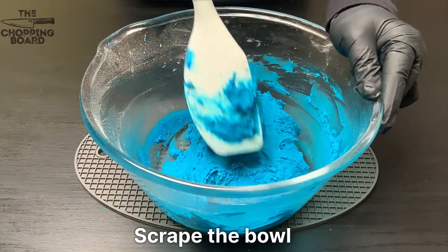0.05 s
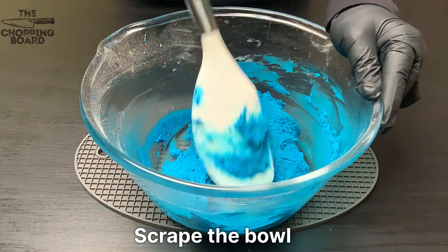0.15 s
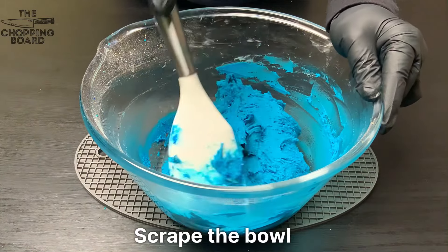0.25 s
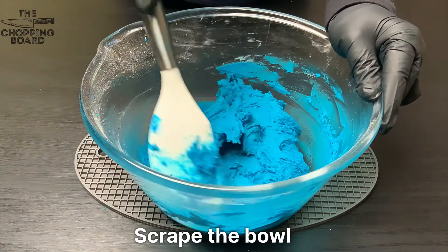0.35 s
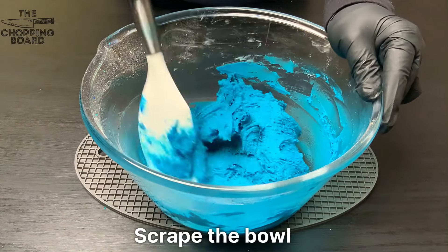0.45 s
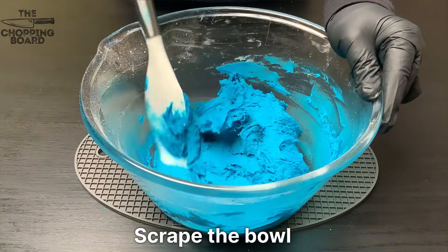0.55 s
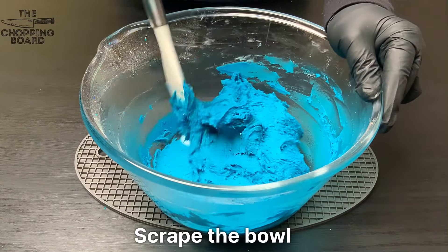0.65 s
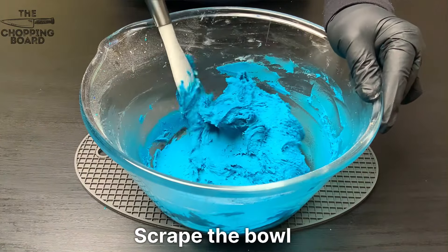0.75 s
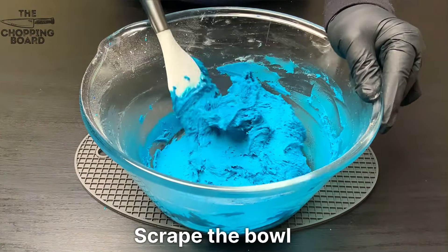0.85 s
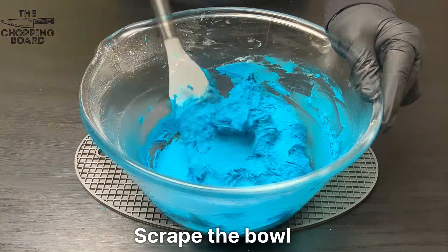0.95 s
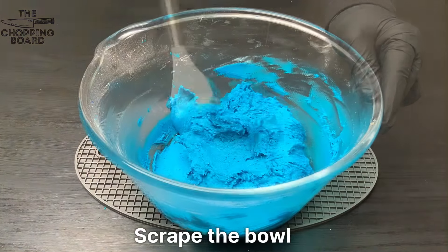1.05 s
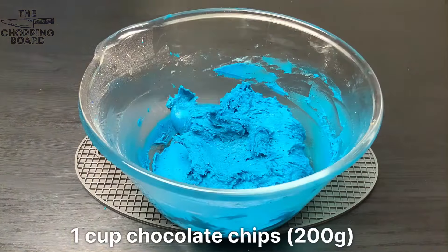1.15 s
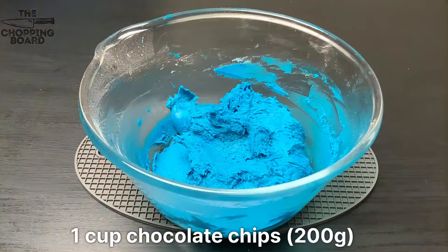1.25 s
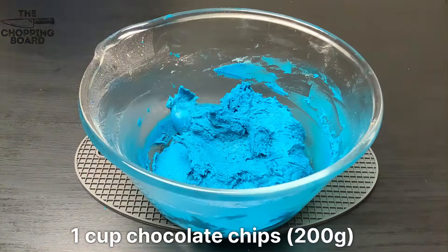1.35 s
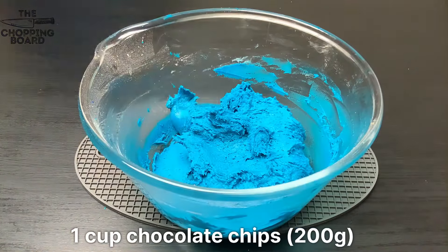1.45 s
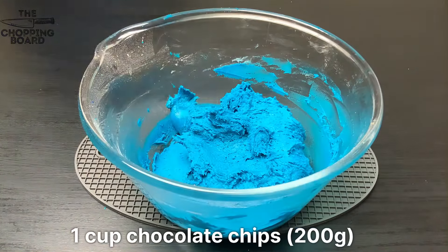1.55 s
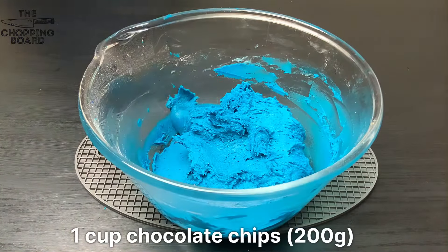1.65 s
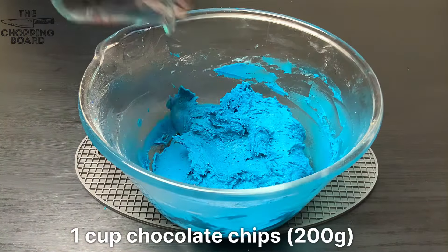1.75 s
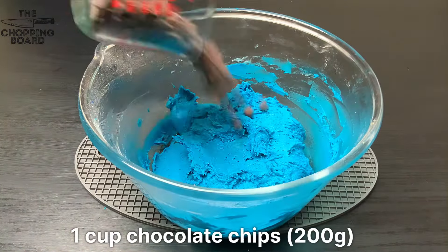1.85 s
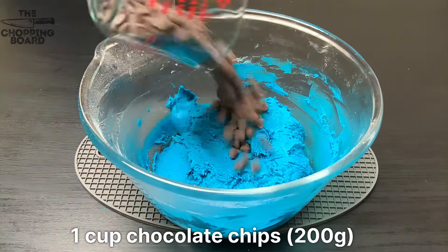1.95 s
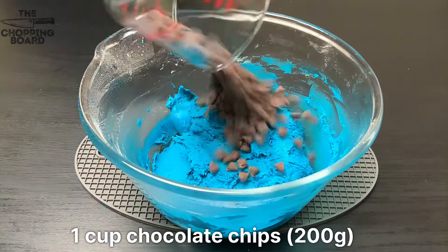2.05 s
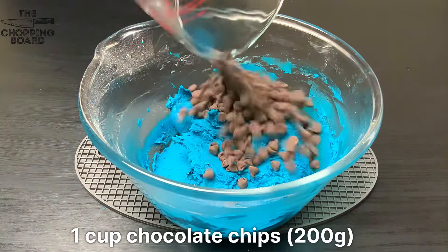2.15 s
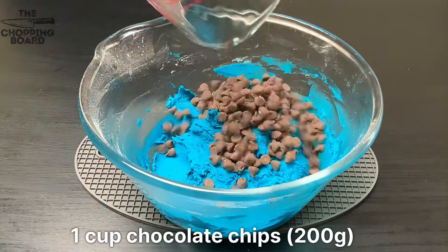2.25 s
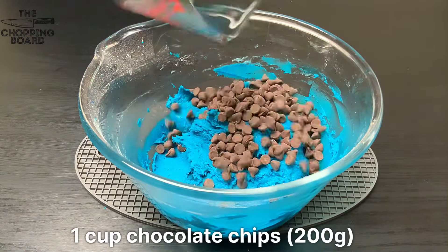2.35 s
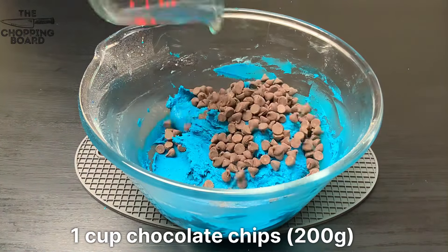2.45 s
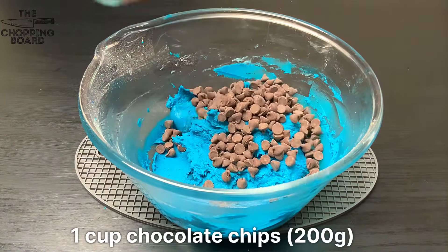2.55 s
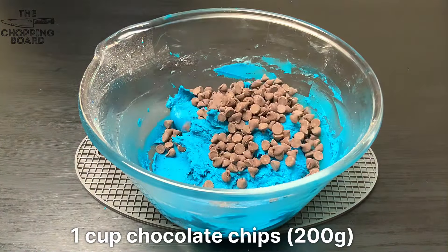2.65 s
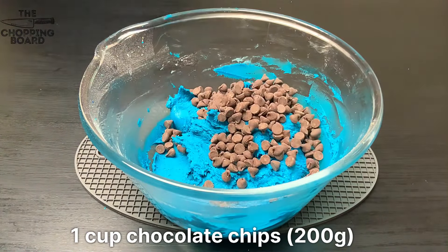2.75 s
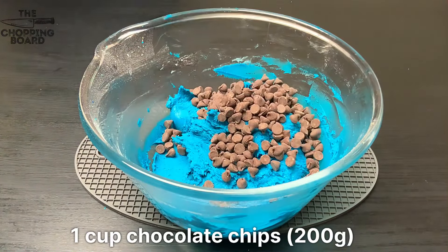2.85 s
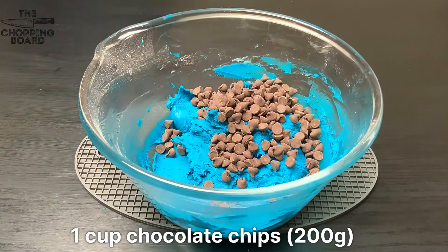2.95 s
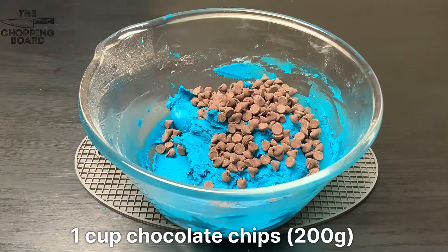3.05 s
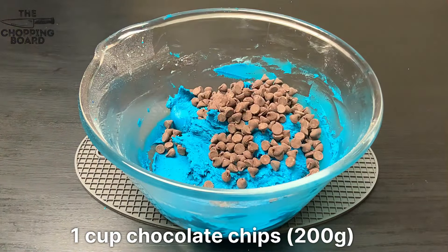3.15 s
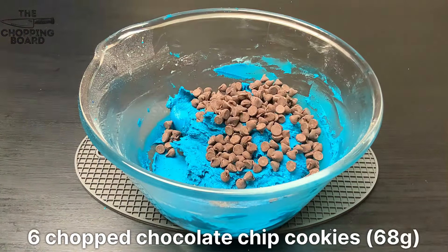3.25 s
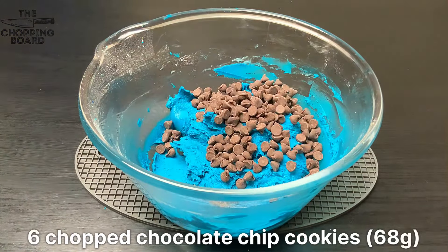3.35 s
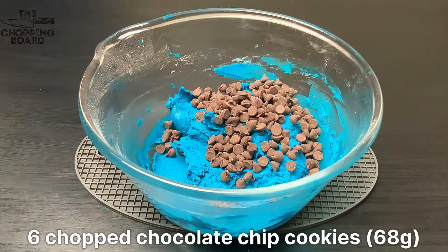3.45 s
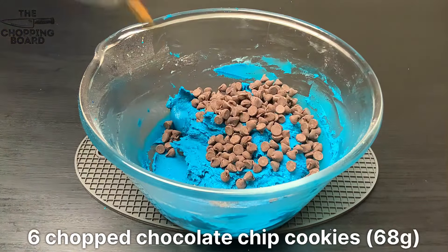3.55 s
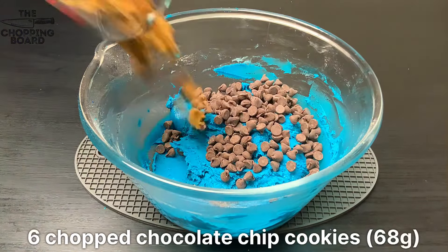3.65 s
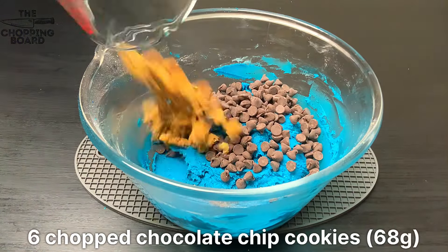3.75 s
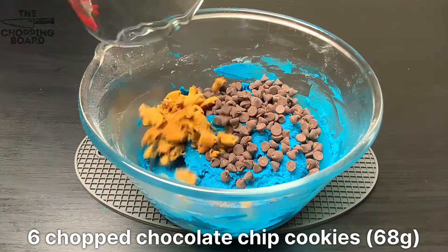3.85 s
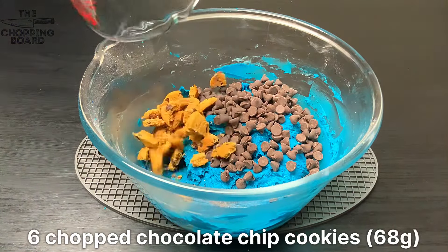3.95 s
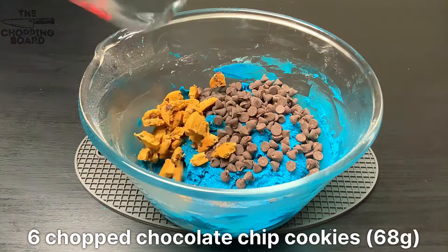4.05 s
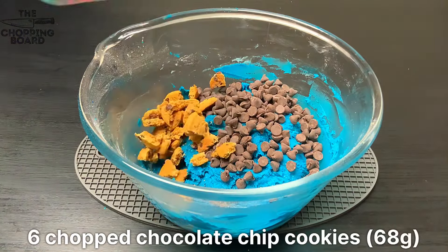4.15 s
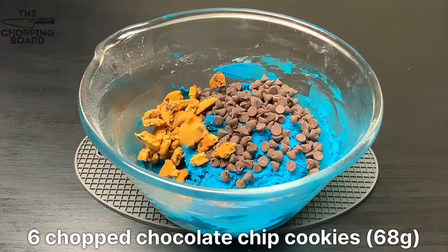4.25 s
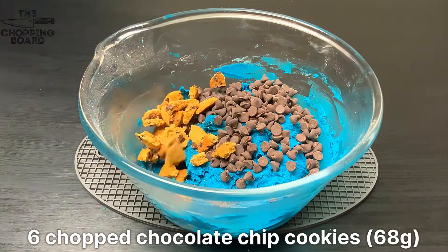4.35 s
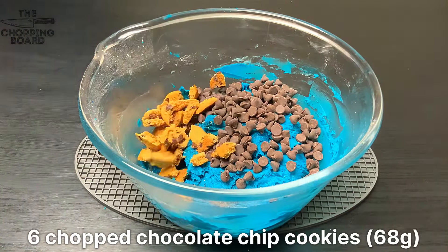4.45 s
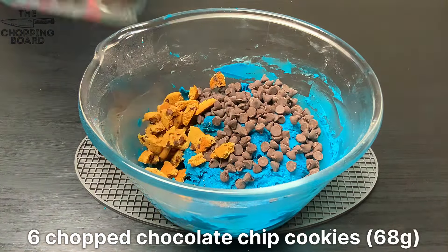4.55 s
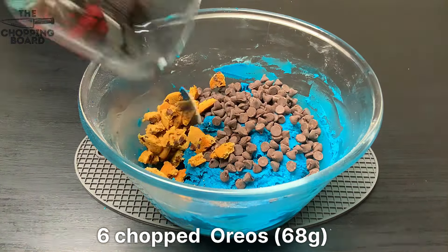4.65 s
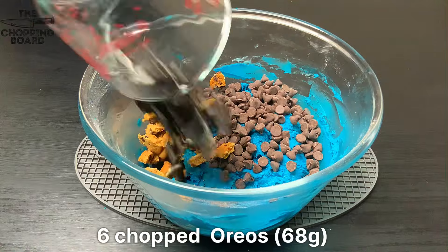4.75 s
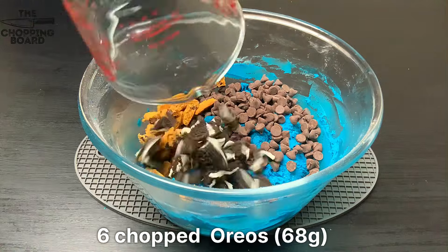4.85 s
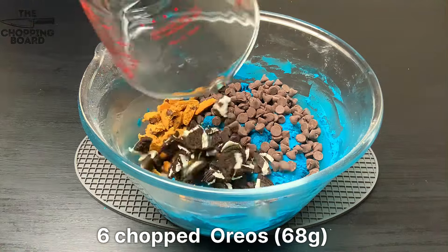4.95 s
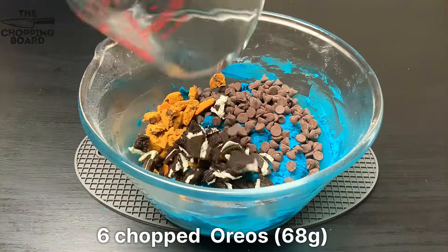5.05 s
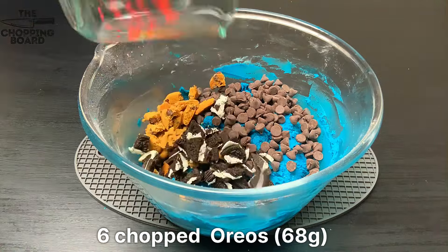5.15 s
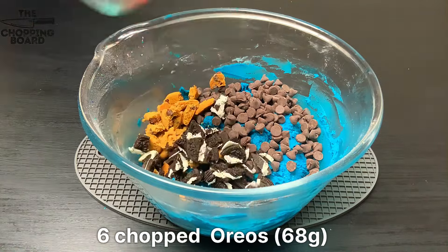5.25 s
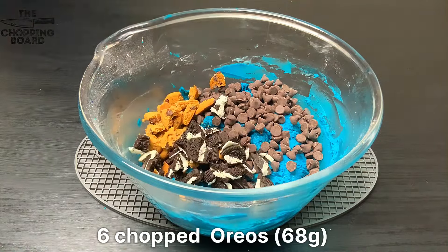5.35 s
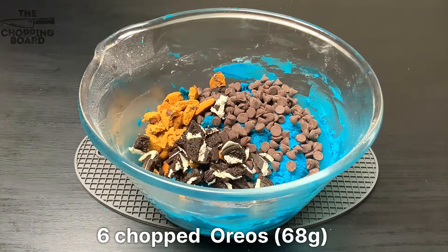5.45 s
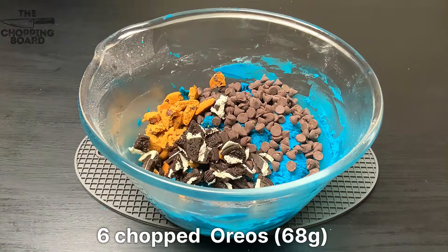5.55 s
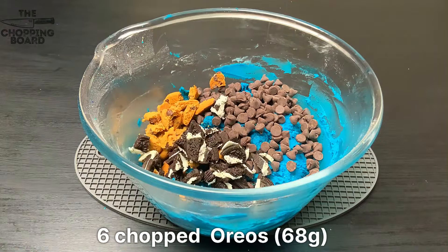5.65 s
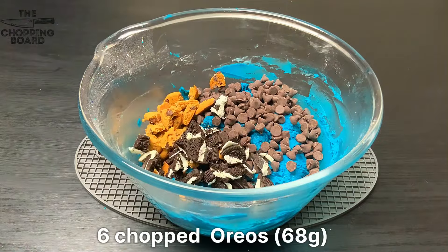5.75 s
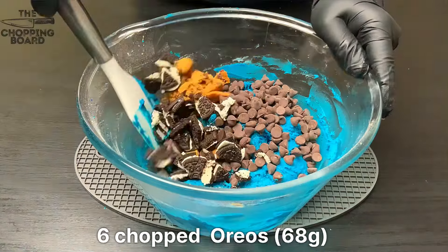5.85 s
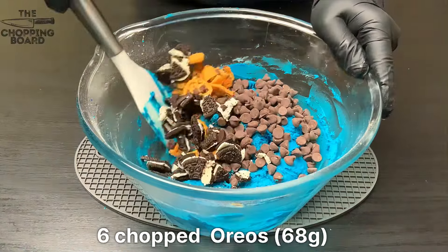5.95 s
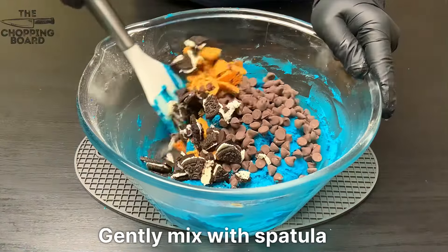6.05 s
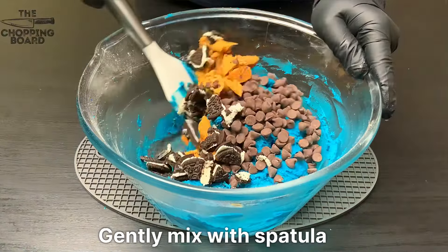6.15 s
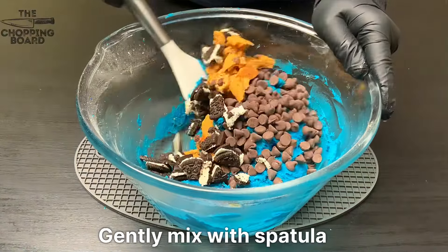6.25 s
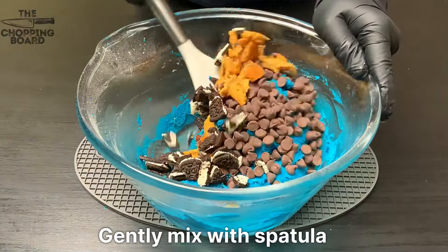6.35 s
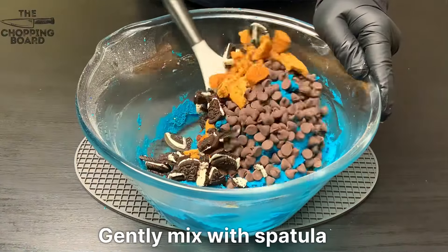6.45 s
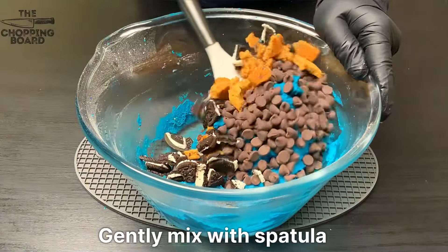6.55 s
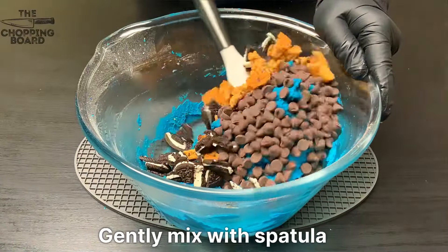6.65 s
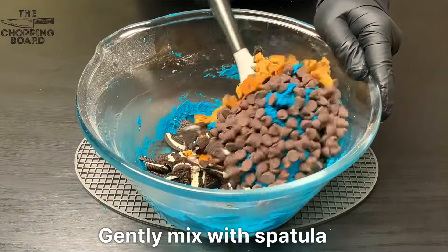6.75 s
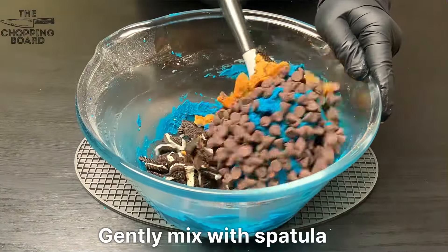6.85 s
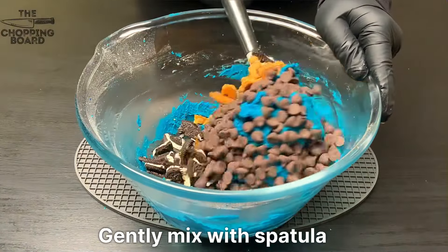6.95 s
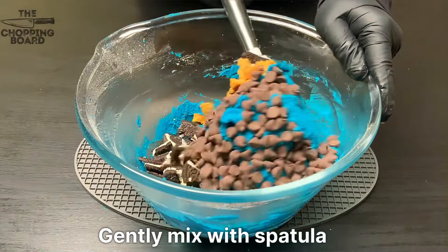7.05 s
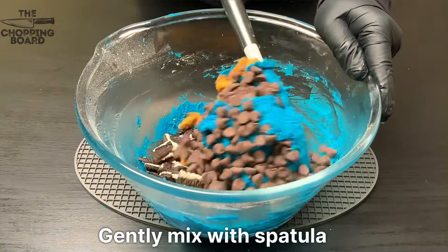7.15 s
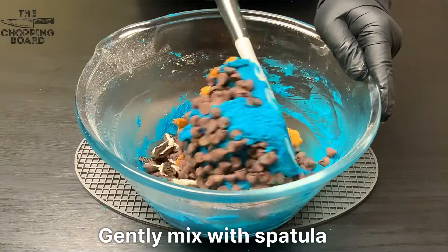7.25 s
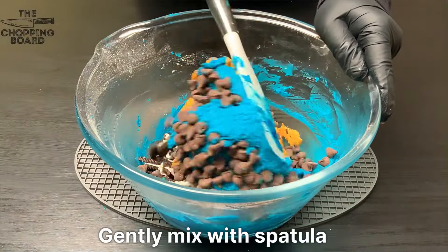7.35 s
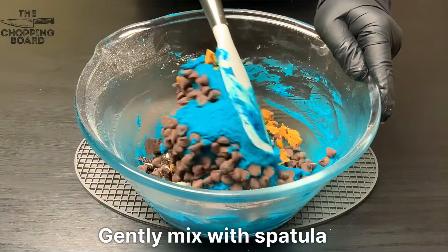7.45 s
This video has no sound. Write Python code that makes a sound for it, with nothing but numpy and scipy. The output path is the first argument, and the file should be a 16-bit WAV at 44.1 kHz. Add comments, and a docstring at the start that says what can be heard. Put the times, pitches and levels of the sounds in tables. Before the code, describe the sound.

Over a faint steady appliance hum, thick dough is scraped in a glass bowl with one bright, short-ringing knock and a sudden cut. A glass measuring cup tinkles as chocolate chips pour in a dense bright clatter. Light cookie pieces land softly, darker chunks drop with a brief crunchy rattle, then a spatula taps and stirs everything with dull thuds and ticking pieces, miked closely in a small room.

```python
"""A kitchen counter, heard in close stereo: a spatula scrapes dough in a glass bowl and knocks it, three cups of
chocolate and cookie pieces clink in a glass measuring cup and patter into the bowl, then the spatula folds them in.
Glass rings as a sum of decaying modes; pieces tick as short bursts of coloured noise; dough rubs and crackles as
noise with random grains. All that still rings early on stops at once; a quiet hum and a small room lie around."""
import sys
import numpy as np
from scipy import signal
from scipy.fft import rfft, irfft
from scipy.io import wavfile
from scipy.ndimage import uniform_filter1d

SR = 44100
rng = np.random.default_rng(int(sys.argv[2]) if len(sys.argv) > 2 else 0)


def gain_from_db(level_db):
    """Convert decibel levels to linear amplitude factors (20 dB per decade)."""
    decades = np.asarray(level_db, float) / 20
    return 10 ** decades


def inscribe(sig):
    """Save sig as 16-bit PCM at rate SR to the path in sys.argv[1].

    A 1-D sig is mono; a 2-D sig holds one channel per row.
    Samples are clipped to [-1, 1] before scaling.
    """
    pcm = np.round(np.clip(np.atleast_2d(sig).T, -1, 1) * 32767)
    wavfile.write(sys.argv[1], SR, pcm.astype(np.int16))


N = 331191
TIME = np.arange(N) / SR
TAIL = TIME[:SR // 3]  # time after a blow, s
CUT_S = 1.192  # all that still rings stops here
HOLD_FROM_S, HELD = 5.8, 0.52  # from here a hand steadies the bowl; share of its ring length then left
SPLIT = .008  # uneven glass: every mode is a close pair, this share of its pitch apart


def gain_at(points, hz):
    """Spectral envelope: gain of (f/Hz, level/dB) points, straight in dB on a log frequency axis."""
    f, db = np.transpose(points)
    return gain_from_db(np.interp(np.log(hz + 1), np.log(f), db))


def colour(x, points):
    """Linear filtering: shapes a spectrum while keeping the power of white noise."""
    gain = gain_at(points, np.fft.rfftfreq(x.shape[-1], 1 / SR))
    return irfft(rfft(x) * gain / np.sqrt(np.mean(gain ** 2)), x.shape[-1])


def coloured_noise(points):
    """Filtered white noise over the whole scene."""
    return colour(rng.standard_normal(N), points)


def curve(rows, column):
    """Temporal envelope: gain along one dB column of timed rows, near silent outside them."""
    return gain_from_db(np.interp(TIME, np.transpose(rows)[0], np.transpose(rows)[column], left=-150, right=-150))


def lumps(per_s, spread_db):
    """Amplitude modulation: gain that wanders at random, about per_s new levels a second."""
    k = int(SR / per_s)
    levels = np.repeat(rng.standard_normal(N // k + 1), k)
    return gain_from_db(spread_db * uniform_filter1d(levels, k)[:N])


def grains(per_s, spread_db, smear_s):
    """Shot noise: random clicks of very uneven size, each a short noise burst; rms 1."""
    happens = rng.random(N) < per_s / SR
    size = happens * gain_from_db(spread_db * np.minimum(rng.exponential(size=N), 4))
    envelope = signal.lfilter([1], [1, -np.exp(-1 / (smear_s * SR))], size)
    x = envelope * rng.standard_normal(N)
    return x / x.std()


def paired(modes, length):
    """Split degeneracy: each mode becomes two neighbours that beat, ring time scaled."""
    return [(hz * (1 + side * SPLIT), db, t60 * length) for hz, db, t60 in modes for side in (-.5, .5)]


def ring(x, modes):
    """Driven resonance: touches excite every mode; rms kept near that of the stream."""
    kick = 1. * (TAIL == 0)
    driven, response = 0, 0
    for hz, db, t60 in modes:
        turn = 2 * np.pi * hz / SR
        r = np.exp(-np.log(1000) / (t60 * SR))
        b, a = [gain_from_db(db) * np.sin(turn)], [1, -2 * r * np.cos(turn), r * r]
        driven = driven + signal.lfilter(b, a, x)
        response = response + signal.lfilter(b, a, kick)
    return driven / np.linalg.norm(response)


def strike(modes, tilt_db, length, scatter_db):
    """Free modal decay: a blow gives each mode its own share and phase; peak 1."""
    hz, db, t60 = np.transpose(paired(modes, length))[:, :, None]
    chance = rng.standard_normal((len(hz), 2))
    share_db = db + tilt_db * np.log2(hz / 3000) + scatter_db * chance[:, :1]
    size = gain_from_db(share_db - 60 * TAIL / t60)
    x = np.sum(size * np.sin(2 * np.pi * hz * TAIL + chance[:, 1:]), axis=0)
    return x / np.abs(x).max()


def burst(points, t60):
    """Exponential decay: a dying burst of coloured noise."""
    return colour(rng.standard_normal(len(TAIL)), points) * gain_from_db(-60 * TAIL / t60) / 2


def add(out, s, x):
    """Superposition: mixes x in from time s, up to the cut or the end."""
    i = int(s * SR)
    x = x[:(int(CUT_S * SR) if s < CUT_S else N) - i]
    out[i:i + len(x)] += x


def by_stretch(tool, x):
    """Memory reset: runs a ringing tool before and after the cut, each from silence."""
    return np.concatenate([tool(part) for part in np.split(x, [int(CUT_S * SR)])], axis=-1)


# spectrum of the hum: f/Hz, relative level/dB
HUM_SPECTRUM = [(12, -21), (20, 4), (46, 4), (81, -15), (123, -0.5), (204, -14.5), (367, -20.5), (410, -11),
                (527, -17), (590, -4), (660, -21.5), (4670, -42.5), (9950, -51.5), (12100, -41),
                (16000, -41)]


def hum():
    """Stationary noise: fans and far appliances, a wavering low tone and a faint band near 590 Hz."""
    bed = coloured_noise(HUM_SPECTRUM) * lumps(4, 1.7)
    tone = coloured_noise([(105, -38.0), (121, 21.5), (138, -41.5)])
    air = coloured_noise([(380, -14.0), (430, -14.0), (500, -11.0), (590, 11.0), (680, -30)])
    return gain_from_db(-62.5) * (bed + gain_from_db(-10.5) * tone + gain_from_db(-20) * air)


# steady floor between the actions: rustle level/dB, crackle level/dB, thud level/dB
STILL_LEVELS = (-89.5, -86.5, -66.5)
# soft swells of hiss, perhaps a glove or sleeve: middle t/s, half length t/s, level/dB, treble level/dB
HISS_SWELLS = [(0.306, 0.49, -89, -76.5), (1.362, .08, -80.5, -83.5), (2.913, 0.13, -74, -87),
               (3.171, 0.053, -79, -84.5), (4.279, 0.097, -73, -77), (5.203, 0.16, -75, -76),
               (5.55, 0.11, -80.5, -80.5)]
# spectrum of pattering pieces, also of the lower hiss: f/Hz, relative level/dB
PATTER_SPECTRUM = [(500, -31.5), (1200, -6.5), (2500, -4), (4000, -2), (5000, 6.5), (7500, -5.5),
                   (10000, -5), (16000, -23.5)]
# spectrum of fine crackle, also of the treble hiss: f/Hz, relative level/dB
CRACKLE_SPECTRUM = [(4000, -31), (8000, -2.5), (10000, 1.5), (13000, 3.5), (15600, -8), (16500, -38.5)]


def stir():
    """Band-shaped noise: faint smooth hiss, swelling now and then along half a cosine cycle."""
    low, high = gain_from_db(STILL_LEVELS[0]), gain_from_db(STILL_LEVELS[1])
    for s, half, db, treble_db in HISS_SWELLS:
        swell = np.cos(np.pi / 2 * np.clip((TIME - s) / half, -1, 1))
        low = low + gain_from_db(db) * swell
        high = high + gain_from_db(treble_db) * swell
    return low * coloured_noise(PATTER_SPECTRUM) + high * coloured_noise(CRACKLE_SPECTRUM)


# strokes in the dough, scraping and later folding: t/s, rub level/dB, fine crackle level/dB
SPATULA_STROKES = [
    [(0, -127.5, -79), (.29, -118, -84.5), (.48, -93, -68.5), (.69, -81, -66), (.86, -83.5, -72),
     (.94, -65.5, -55), (1.04, -59, -70), (1.12, -54.5, -83), (1.2, -73.5, -87)],
    [(5.6, -78, -92), (5.77, -74.5, -71.5), (5.88, -67.5, -68), (5.94, -69, -59.5), (6.11, -67.5, -63.5),
     (6.21, -65.5, -72), (6.26, -62.5, -67), (6.34, -56, -69), (6.48, -67, -67), (6.63, -58.5, -65),
     (6.82, -55, -56), (6.9, -53, -57), (7.01, -58.5, -57), (7.15, -58, -61), (7.28, -54, -53.5),
     (7.36, -63, -67.5), (7.51, -62.5, -73)],
]
# how the rub of each action carries on: touch on the bowl level/dB, thud level/dB, both over the rub
STROKE_CARRY = [(3, -1), (-8.5, -5)]


def spatula_gains():
    """Friction coupling: a drag sets the rub, the touch on the bowl and the thud together."""
    rub, fine, touch, thud = np.zeros((4, N))
    for rows, (touch_db, thud_db) in zip(SPATULA_STROKES, STROKE_CARRY):
        drag = curve(rows, column=1)
        rub += drag
        fine += curve(rows, column=2)
        touch += gain_from_db(touch_db) * drag
        thud += gain_from_db(thud_db) * drag
    return rub, fine, touch, thud


# spectrum of the spatula's rub: f/Hz, relative level/dB
RUB_SPECTRUM = [(250, -27), (600, -12), (1200, 2), (2500, 0), (5000, 2), (7500, -6.5), (10000, -8),
                (16000, -19.5)]


def dough(rub, fine):
    """Stick-slip as random excitation: a lumpy rub mixed with sparse grains, and its fine crackle."""
    grainy = .48  # power share of grains
    smooth = np.sqrt(1 - grainy) * rng.standard_normal(N) * lumps(25, 3.0)
    x = smooth + np.sqrt(grainy) * grains(220, 7.4, 0.0015)
    return rub * colour(x, RUB_SPECTRUM) + fine * colour(x, CRACKLE_SPECTRUM)


# spectrum of dull thuds: f/Hz, relative level/dB
THUD_SPECTRUM = [(20, -2.5), (50, 7), (90, 2), (130, 7), (200, -8.5), (400, -9.5), (700, -7), (1100, -14),
                 (1600, -32)]


def thuds(thud):
    """Low-frequency impact noise: dull noise of wandering strength."""
    return thud * lumps(9, 1.8) * coloured_noise(THUD_SPECTRUM)


# single pieces that land, snap or come unstuck: t/s, level/dB, centre f/Hz, bowl ring level/dB over the tick
PIECE_TICKS = [(0.842, -39.5, 11500, -11), (1.3364, -52.5, 3970, -21), (2.0502, -25.5, 5000, -0.5),
               (2.1848, -17.5, 5130, -34), (2.2456, -18.5, 6600, -16.5), (2.296, -21.5, 5600, -13),
               (2.377, -29, 4940, -5.5), (2.4121, -28, 13300, -23), (2.4661, -35.5, 5060, -13),
               (2.5496, -38, 10750, -37), (2.5853, -43, 4870, -16), (2.6958, -41, 5010, -21.5),
               (3.7015, -32, 9540, -13), (3.7052, -30, 9560, -21), (3.718, -32.5, 3630, -20),
               (3.7961, -39, 2900, -23), (4.0144, -53, 10600, -18.5), (4.7858, -32, 4360, -18),
               (4.8065, -23.5, 14300, -35), (4.8207, -27.5, 3300, -22), (4.822, -36, 310, -40),
               (4.8492, -29.5, 14600, -38), (4.9026, -33.5, 2700, -1), (4.9601, -47.5, 2700, -18),
               (5.1234, -40, 5160, -18.5), (5.1228, -34.5, 12500, -30.5), (5.1846, -48, 3830, -28),
               (6.265, -39, 2780, -25), (6.347, -37, 2770, -27), (6.4248, -37, 3960, -23),
               (6.5707, -41, 3660, -3.5), (6.6645, -33, 3860, -7.5), (6.6882, -34.5, 11900, -29),
               (6.7412, -37.5, 2720, -12), (6.7896, -30.5, 5200, -12), (6.863, -30.5, 6130, -28),
               (6.9106, -28, 11100, -26), (7.0218, -32.5, 12300, -19), (7.0375, -35, 9500, -30),
               (6.9452, -38, 3900, -26), (7.0902, -36, 9540, -26), (7.1589, -41, 3900, -20),
               (6.6404, -40.5, 2750, -6), (6.8092, -37, 4670, -20), (7.0728, -27.5, 11900, -31),
               (7.1379, -39, 14600, -23), (7.1977, -34, 10700, -28), (7.2235, -28, 10600, -16),
               (7.2869, -35.5, 4660, -24.5), (7.4247, -32, 2740, -22)]
# modes of the glass bowl: f/Hz, relative level/dB, unscaled t60/s
BOWL_MODES = [(474.8, -10.5, 0.75), (1069, -14.5, 0.47), (1812, -4, 0.33), (2785, 1.5, 0.27),
              (3910, -1, .25), (4757, -2, 0.13), (5310, 4.5, 0.053), (5620, 2, 0.2), (6650, -7.5, 0.16),
              (7004, -11, 0.049), (7692, -17, .1), (8695, -3, 0.11), (9560, -5, .1), (10766, 0.5, 0.058)]


def ticks():
    """Impulsive excitation: a narrow noise burst per piece, with some ring of the bowl."""
    out = np.zeros(N)
    for s, db, hz, ring_db in PIECE_TICKS:
        tone = [(hz / 8, -24), (hz / 1.1, -7), (hz, 0), (hz * 1.2, -7), (hz * 4, -20)]
        length = 1 if CUT_S < s < HOLD_FROM_S else HELD
        bowl = strike(BOWL_MODES, 0, length, scatter_db=5.5)
        add(out, s, gain_from_db(db) * (burst(tone, t60=0.023) + gain_from_db(ring_db) * bowl))
    return out


# spatula on the bowl: t/s, ring peak level/dB, crack level/dB over it, tilt/(dB per octave), ring length share
BOWL_KNOCKS = [(0.869, -8.5, -2, 2, 0.46), (1.089, -39.5, 3.5, -7.5, 0.45), (5.868, -14.5, 7.5, 6.5, 0.46),
               (6.059, -50, 10, 3, 1), (6.199, -25, 0.5, -3.5, 0.39), (6.456, -42.5, -1.5, 5, 0.61)]
# modes of the bowl gripped by a hand, spatula resting on it: f/Hz, relative level/dB, unscaled t60/s
GRIPPED_MODES = [(430, -9.5, 0.48), (1000, -31, .08), (1420, 0.5, 0.041), (1636, 3, 0.071),
                 (1930, -2, 0.23), (2150, -12, 0.24), (2780, 9, 0.14), (3540, -18, 0.066),
                 (3955, -10, 0.75), (4776, -6.5, 0.36), (4970, -12, 0.16), (5300, -6, 0.085),
                 (5990, -10.5, 0.062), (5980, -7.5, .15), (6487, -7, .08), (8090, -28, .1),
                 (9000, -24.5, .1), (9300, -7, 0.015), (14000, -15, .05)]
# spectrum of a knock's crack, before its tilt: f/Hz, relative level/dB
CRACK_SPECTRUM = [(200, -24), (450, -13.5), (800, -10.5), (1600, 6), (3000, -2.5), (6000, -2),
                  (9000, -12.5), (15500, -6.5), (16800, -33.5)]


def knocks():
    """Impact spectrum: a ring of gripped glass and a short crack, duller for a soft blow."""
    out = np.zeros(N)
    for s, db, crack_db, tilt_db, length in BOWL_KNOCKS:
        tone = [(hz, g + min(tilt_db, 0) * 1.6 * np.log2(hz / 3000)) for hz, g in CRACK_SPECTRUM]
        crack = burst(tone, .03) + gain_from_db(-8) * burst(tone, .08)
        glass = strike(GRIPPED_MODES, tilt_db, length, scatter_db=-0.5)
        add(out, s, gain_from_db(db) * (glass + gain_from_db(crack_db) * crack))
    return out


def rocking_gains():
    """Damped rocking: after a knock the bowl thuds on its mat and rattles, both fading exponentially."""
    thud, rattle = np.zeros((2, N))
    after = TIME[:SR // 2]
    for s, db, *_ in BOWL_KNOCKS:
        add(thud, s, gain_from_db(-45.5 + 0.29 * db - 136 * after))  # dB, share of the knock's dB, fade in dB per s
        add(rattle, s, gain_from_db(-20.5 + db - 500 * after))
    return thud, rattle


# pieces on the cup: t/s, ring peak level/dB, crack level/dB over it, tilt/(dB per octave)
CUP_CLINKS = [(1.5274, -35, 3, -0.5), (1.6641, -46, -16, 1), (1.6958, -47, -4, 1), (1.712, -18.5, -9.5, 3),
              (1.727, -22, 3.5, 2), (1.7961, -25, 3.5, 1.5), (1.8245, -46.5, 0.5, -6),
              (1.8636, -31, -16, 14), (2.1304, -16.5, -6.5, 15.5), (2.1464, -14.5, -17, 5),
              (3.483, -35.5, -16, -20), (3.504, -44, -7, -3.5), (3.6252, -44.5, -3.5, -5),
              (3.66, -47, -6, 27), (3.7352, -36, 6.5, -6), (4.564, -39, -13, 1.5), (4.6533, -38, -4, 9),
              (4.7055, -37.5, -2, 4), (4.7189, -33, 0, -6.5), (4.7432, -28.5, -9.5, -5)]
# modes of the measuring cup: f/Hz, relative level/dB, unscaled t60/s
CUP_MODES = [(1560, -2, 0.16), (3912, 6.5, 0.15), (4360, 2.5, 0.2), (7210, -1.5, 0.082), (7630, -8, 0.45),
             (9094, -6, 0.17), (9553, 4, .12), (10700, -6.5, 0.17), (10500, -8, 0.054), (12150, -3, 0.28),
             (12170, -12.5, .1), (14700, -5.5, .1), (15700, -26, .08)]


def clinks():
    """Modal excitation: a shortened ring of the cup and a bright crack per clink."""
    out = np.zeros(N)
    for s, db, crack_db, tilt_db in CUP_CLINKS:
        glass = strike(CUP_MODES, tilt_db, 0.57, scatter_db=2.5)
        add(out, s, gain_from_db(db) * (glass + gain_from_db(crack_db) * burst(CRACKLE_SPECTRUM, 0.019)))
    return out


# three pours (chocolate chips, light cookie pieces, dark cookie pieces):
# t/s, sliding in the cup level/dB, landing on the heap level/dB, rolling against the bowl level/dB
POUR_STAGES = [
    [(1.55, -62.5, -110, -110), (1.68, -60.5, -91, -100), (1.73, -37, -74.5, -104), (1.8, -44.5, -73, -93),
     (1.86, -42.5, -60.5, -80), (1.9, -44, -47, -74), (2.04, -49.5, -45, -54), (2.06, -43, -41.5, -40),
     (2.12, -46, -39, -39.5), (2.14, -36.5, -36, -36.5), (2.21, -87, -46.5, -38), (2.33, -76, -59.5, -69),
     (2.45, -100, -70.5, -74), (2.7, -110, -91.5, -83)],
    [(3.49, -69, -100, -100), (3.525, -66.5, -93.5, -100), (3.6, -87, -72, -104), (3.65, -76, -73.5, -94),
     (3.7, -69, -71.5, -65), (3.745, -57, -58, -77), (3.87, -100, -70, -78.5), (3.98, -110, -109, -105)],
    [(4.56, -70, -100, -110), (4.64, -76.5, -91.5, -110), (4.745, -47, -84, -92), (4.82, -51, -49, -55),
     (4.87, -73, -59.5, -81), (4.905, -100, -65.5, -44), (4.97, -110, -71, -96), (5.2, -110, -94, -84)],
]
# kind of piece in each pour: fine crackle level/dB and thud level/dB over landing, clatter level/dB over rolling
PIECE_KINDS = [(10.5, -19, 7.5), (-5.5, 8, -6), (5.5, 4.5, -6)]


def pour_gains():
    """Granular flow: sliding, landing and rolling set the strength of each layer."""
    patter, sparkle, clatter, bowl, cup, thud = np.zeros((6, N))
    for rows, (fine_db, thud_db, clatter_db) in zip(POUR_STAGES, PIECE_KINDS):
        slide, land, roll = (curve(rows, column=k) for k in (1, 2, 3))
        patter += land + gain_from_db(-7) * slide  # sliding rustles below its touch on the glass
        sparkle += gain_from_db(fine_db) * land
        thud += gain_from_db(thud_db) * land
        clatter += gain_from_db(clatter_db) * roll
        bowl += roll
        cup += slide
    return patter, sparkle, clatter, bowl, cup, thud


# spectrum of pieces clattering on glass: f/Hz, relative level/dB
CLATTER_SPECTRUM = [(2500, -25), (4300, -9.5), (4800, 1.5), (5600, 0), (6300, -6.5), (8200, -3), (9600, -4),
                    (12000, -15), (16000, -31)]


def pieces(patter, sparkle, clatter):
    """Many random impacts: dense grains shaped as patter, fine crackle and clatter."""
    x = grains(700, 2.3, 0.0023) * lumps(30, 3.9)
    rattling = colour(grains(900, 2.8, 0.0024), CLATTER_SPECTRUM)
    return patter * colour(x, PATTER_SPECTRUM) + sparkle * colour(x, CRACKLE_SPECTRUM) + clatter * rattling


def touched_glass(bowl, cup, held):
    """Sustained resonance: streams of small touches keep the free bowl, cup and held bowl ringing."""
    touches = grains(500, 2.5, .0003)
    free = ring(touches * bowl, paired(BOWL_MODES, 1.0)) + ring(touches * cup, paired(CUP_MODES, 1.0))
    steadied = by_stretch(lambda x: ring(x, paired(BOWL_MODES, HELD)), touches * held)
    return gain_from_db(-1.5) * free + steadied


def rustle():
    """Superposition of sources: dough, pieces, thuds and touched glass from spatula, knocks and pours."""
    rub, fine, touch, drag_thud = spatula_gains()
    rock_thud, rattle = rocking_gains()
    patter, sparkle, clatter, bowl, cup, land_thud = pour_gains()
    thud = drag_thud + rock_thud + land_thud + gain_from_db(STILL_LEVELS[2])
    return (dough(rub, fine) + thuds(thud) + pieces(patter, sparkle, clatter)
            + touched_glass(bowl, cup, touch + rattle))


def room(x, t60, tail_db):
    """Reverberation, unlike on each side: a quick cluster from counter and bowl, a dull tail from the walls."""
    t = TIME[:SR // 2]
    near = rng.standard_normal((2, len(t))) * gain_from_db(-60 * t / 0.021)
    far = colour(rng.standard_normal((2, len(t))), [(200, 0.0), (4000, -7.5), (12000, -16.5)])
    far = far * gain_from_db(-60 * t / t60)
    echo = near / np.linalg.norm(near[0]) + gain_from_db(tail_db) * far / np.linalg.norm(far[0])
    return by_stretch(lambda part: signal.fftconvolve(part[None], echo, axes=1)[:, :len(part)], x)


# phase turn of the right side, on top of its lead: f/Hz, phase/rad
RIGHT_TURN = [(20, 0), (250, -2), (450, -3.1), (800, -9.2), (1000, -10.9), (1200, -9.3), (3300, -9.7),
              (4000, -8.3), (8000, -9), (10000, -10.6), (12500, -12.7), (15500, -15), (22050, -20)]
# reflections, unrelated left and right: f/Hz, level/dB relative to the direct sound
DIFFUSE_SHARE = [(30, -21), (300, -11.5), (1500, -9), (6000, -8.5), (9000, -10), (16000, -12)]
# gain of the left side: f/Hz, level/dB
LEFT_GAIN = [(30, 0), (130, 2.5), (400, 1.5), (700, -0.5), (1200, 2.5), (2500, 1.5), (5000, 1.5), (9000, 0)]


def scene():
    """Interaural time and phase difference: direct sound with the right side ahead, plus reflections."""
    dry = hum() + stir() + rustle() + ticks() + knocks() + clinks()
    hz = np.fft.rfftfreq(N, 1 / SR)
    lead_s = 40 / 44100
    ahead = np.exp(1j * (2 * np.pi * hz * lead_s + np.interp(hz, *np.transpose(RIGHT_TURN))))
    direct = rfft(dry) * np.array([np.ones(len(hz)), ahead])
    both = direct + rfft(room(dry, t60=0.34, tail_db=0.0)) * gain_at(DIFFUSE_SHARE, hz)
    both[0] *= gain_at(LEFT_GAIN, hz)
    return irfft(both, N)


def top_cut(x):
    """Nothing passes above the cut-off."""
    return signal.sosfilt(signal.butter(12, 16850, fs=SR, output="sos"), x)


def record(dry):
    """Final stage of the signal chain: passes on the finished stereo mix."""
    return top_cut(dry)


dry = scene()
out = record(dry)
inscribe(out)
```